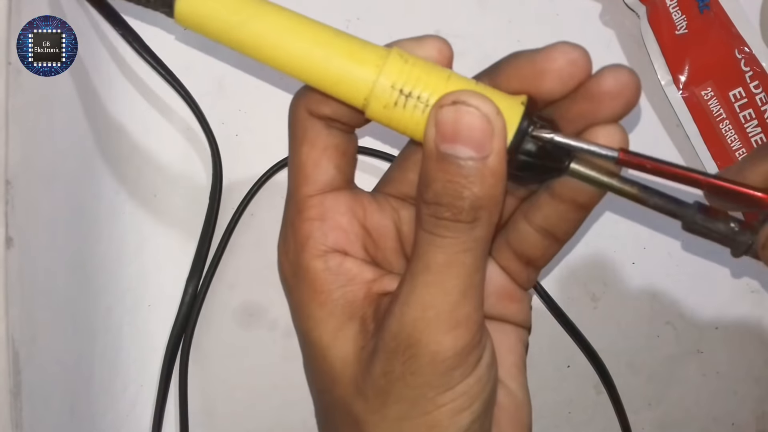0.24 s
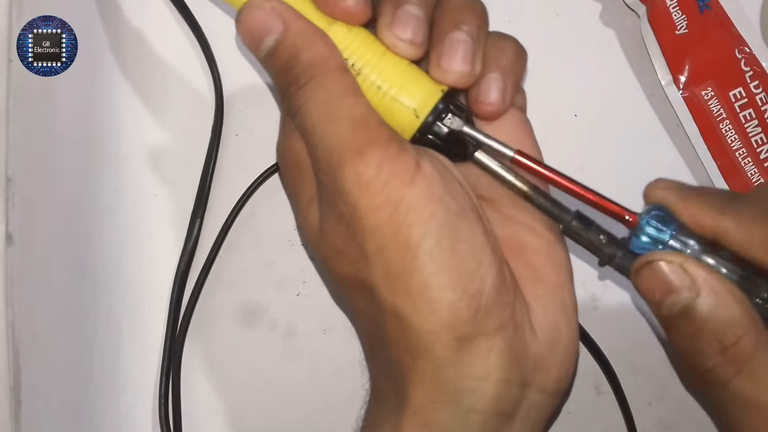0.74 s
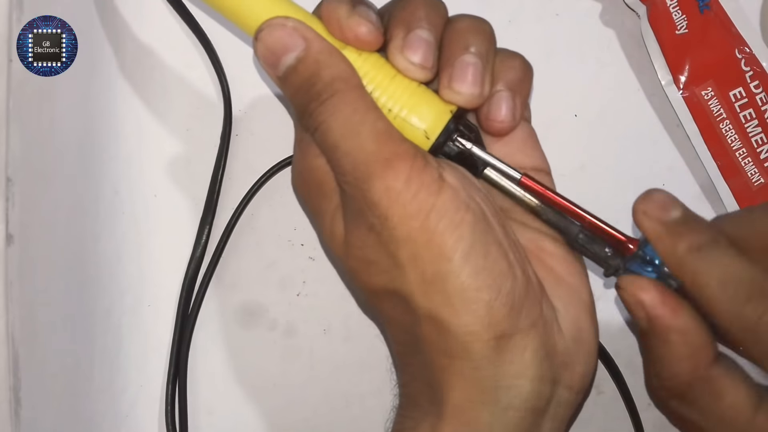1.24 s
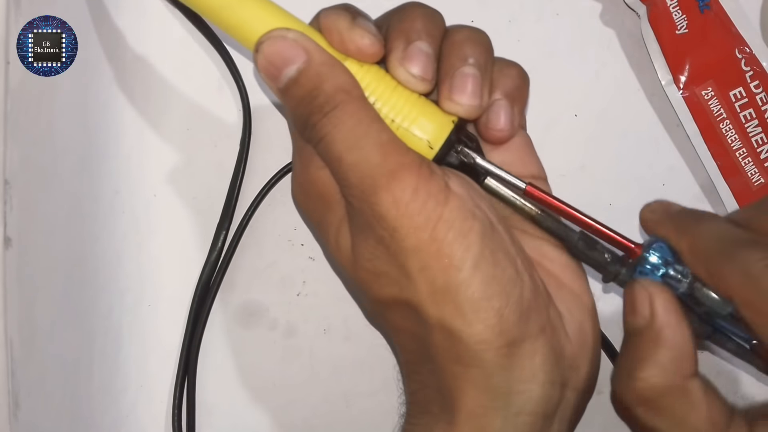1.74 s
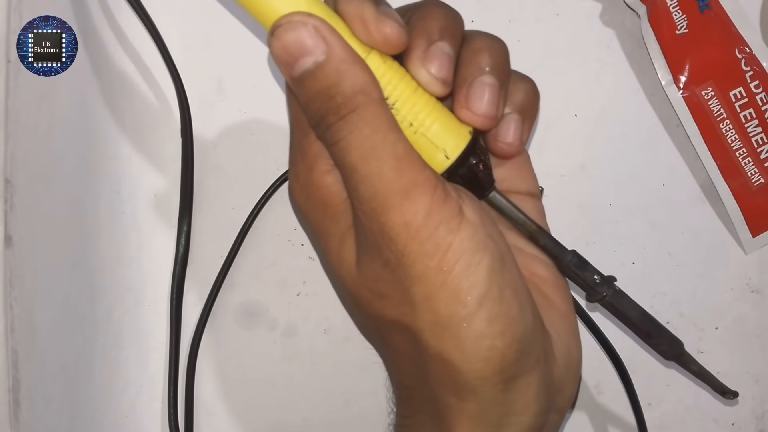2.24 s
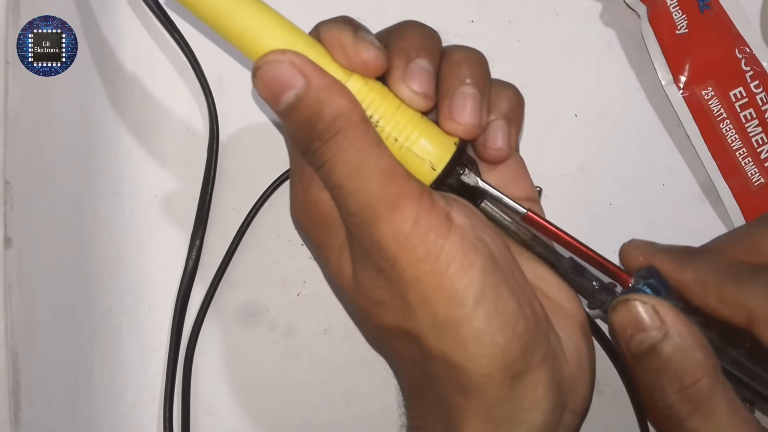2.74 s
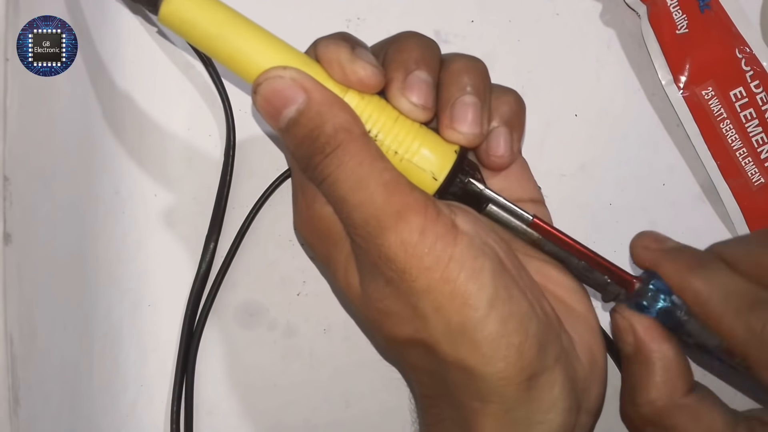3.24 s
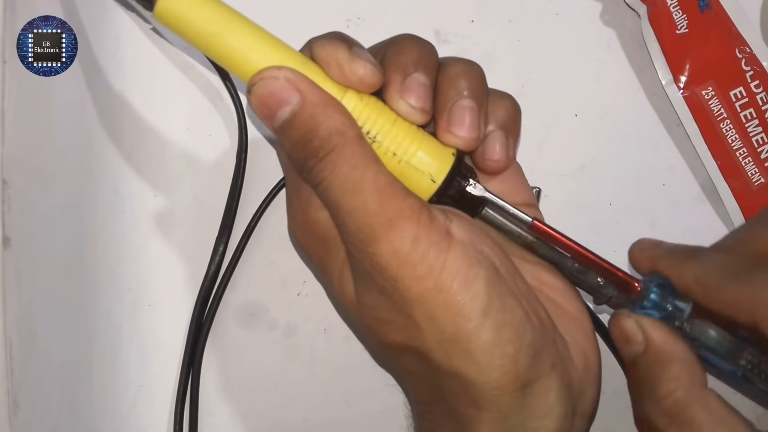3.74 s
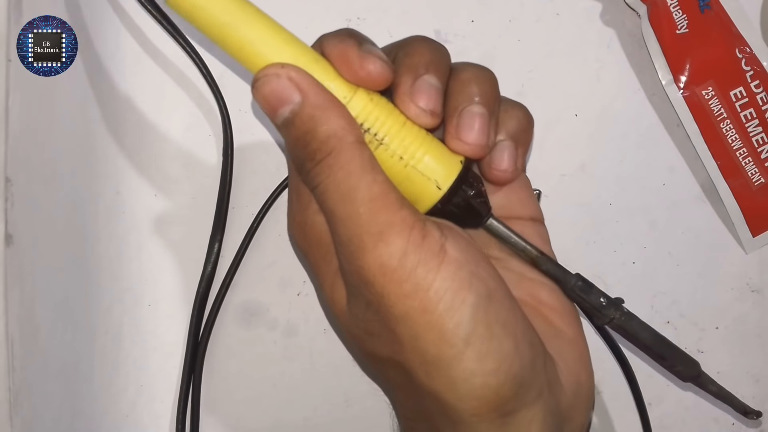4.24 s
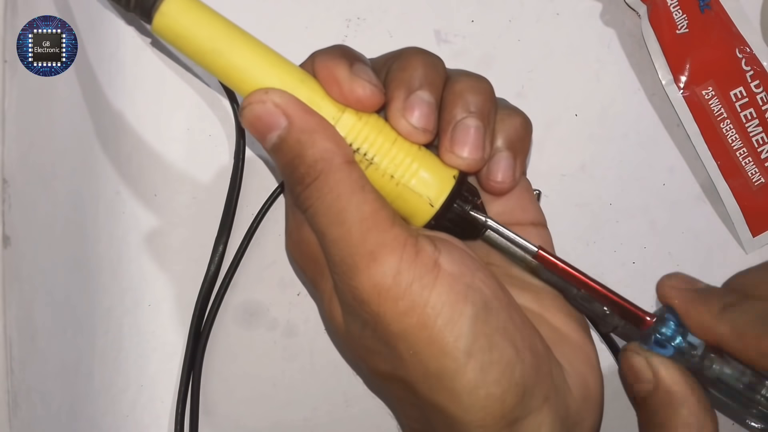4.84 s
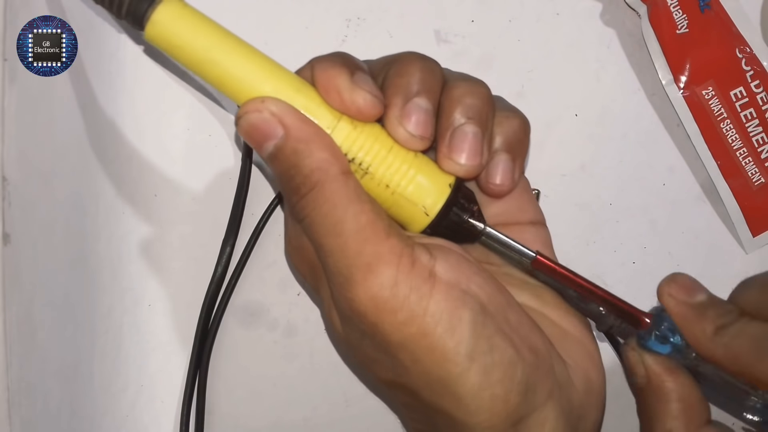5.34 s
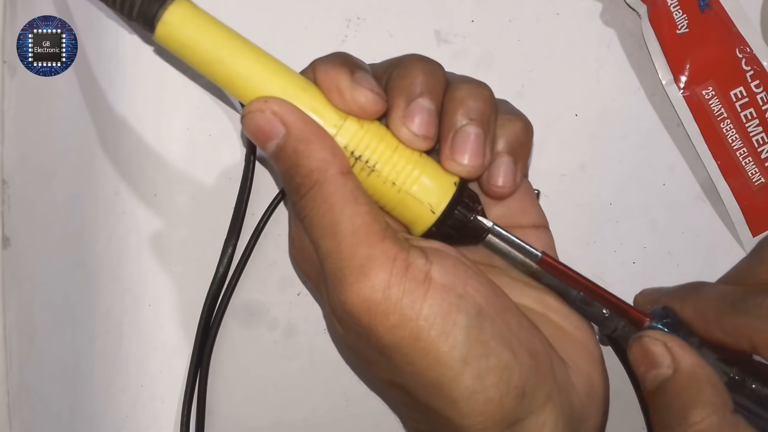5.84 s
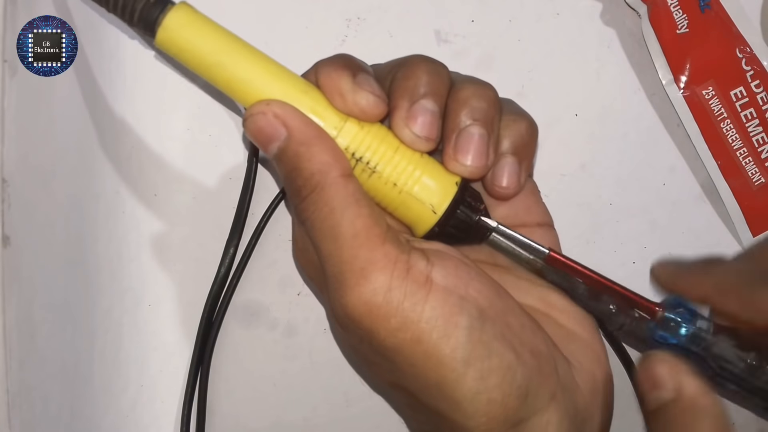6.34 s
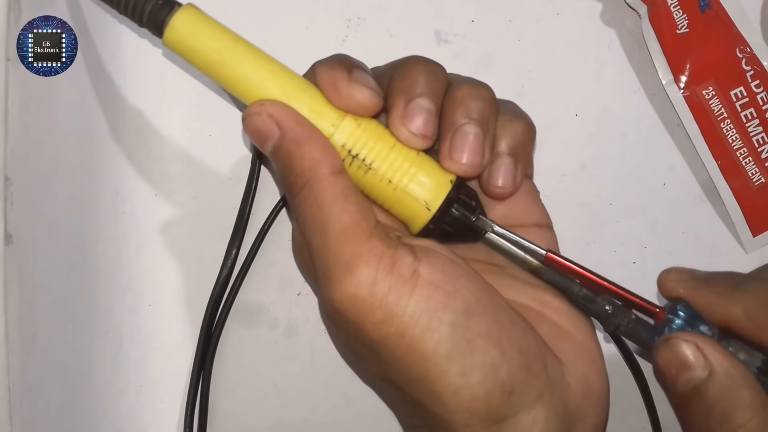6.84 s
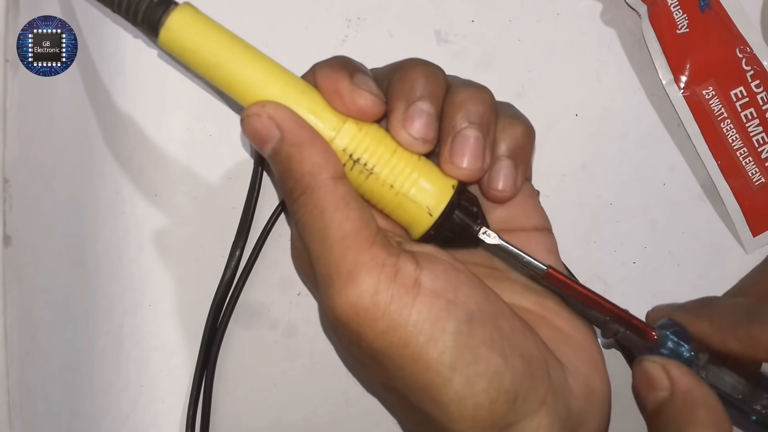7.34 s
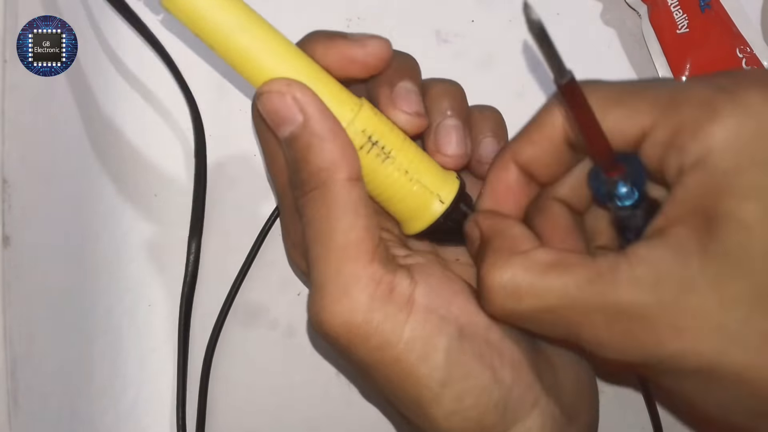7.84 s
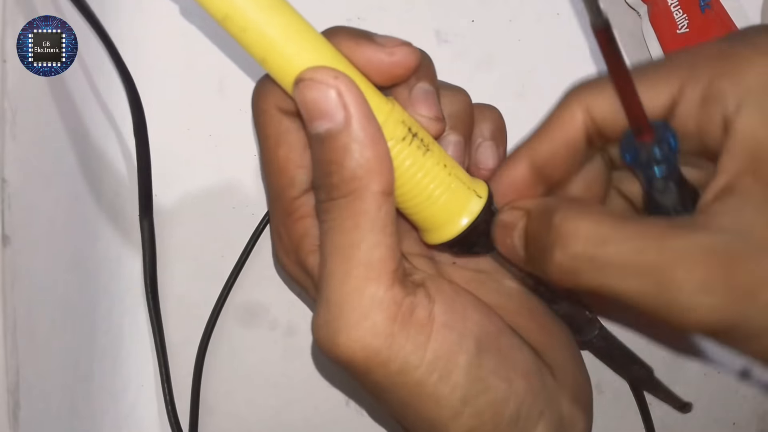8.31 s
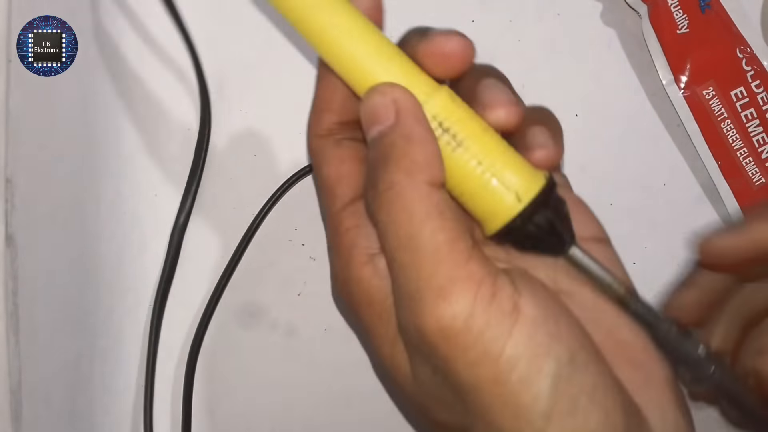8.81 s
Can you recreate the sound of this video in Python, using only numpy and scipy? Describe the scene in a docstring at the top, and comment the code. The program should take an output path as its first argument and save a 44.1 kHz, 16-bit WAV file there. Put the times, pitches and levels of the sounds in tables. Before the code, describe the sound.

Faint metal ticks and small plastic clicks lead into a tiny electric motor's high, hissing whine, with a dropped screw bouncing near the end.

```python
"""In a quiet room with a fan, a small screwdriver ticks on a soldering iron's screws, close to a phone.
Plastic snaps, then a small motor spins up and holds a shrill whine over rushing air and brush hiss.
Near the end a loose screw drops and bounces on the table. Contacts are coloured noise bursts,
the whine is sines locked to one shaft, the rushes are shaped noise, and a short echo gives width."""
import sys
import numpy as np
from scipy import signal
from scipy.fft import rfft, irfft, next_fast_len
from scipy.io import wavfile
from scipy.ndimage import map_coordinates

SR = 44100
rng = np.random.default_rng(int(sys.argv[2]) if len(sys.argv) > 2 else 0)


def wav_record(signal):
    """Record a signal, one row per channel, as 16-bit PCM in the file named by sys.argv[1]."""
    frames = np.transpose(np.atleast_2d(signal))
    bounded = np.clip(frames, -1, 1)
    # unit amplitude maps onto the largest positive 16-bit level
    quanta = np.round(bounded * 32767).astype(np.int16)
    wavfile.write(sys.argv[1], SR, quanta)


N = 399987

# Colour of the room's soft rush: f/Hz, relative density/dB
ROOM_COLOUR = [(20, 0.5), (50, -32), (140, -39.5), (229, -38.5), (427, -22.5), (677, -19), (818, -3),
               (1260, -11.5), (1560, -4), (1940, -9.5), (3340, -20), (5280, -18), (6210, -19.5),
               (6920, -24.5), (16000, -31.5)]
# Wavering fan lines: f/Hz, relative level/dB
FAN_LINES = [(799, -63.5), (912, -88), (943, -70), (1110, -69.5), (1446, -96), (1562, -79), (1599, -65),
             (1791, -77), (2398, -73)]
# Decay time of the room echo: f/Hz, t60/s
WALL_DECAY = [(200, .25), (2000, 0.094), (12000, 0.31)]
# Thin faint whistles: t/s, length/s, f/Hz, level/dB
WHISTLES = [(1.125, .09, 6560, -69), (1.22, .14, 3210, -71), (1.47, 0.16, 3167, -67.5),
            (1.802, .11, 6140, -64), (1.886, 0.64, 3640, -63.5)]
# The rotor's faint hum as it breaks free: t/s, length/s, f/Hz, level/dB
START_HUM = [(2.293, 0.12, 2460, -59.5)]

# Screwdriver tip on the screws: t/s, relative crack level/dB, body against crack/dB
TICKS = [(0.1448, -30, -29), (0.5316, -29, -30), (0.608, -31, -28), (0.6666, -39, -12),
         (0.7597, -32.5, -19), (0.8104, -35, -16), (0.846, -31.5, -36), (1.265, -22, -32),
         (1.5494, -24, -28), (1.7473, -39, -6)]
# Bright colour of metal contacts: f/Hz, relative gain/dB
METAL_COLOUR = [(800, -23), (2500, -4.5), (4500, -1.5), (7000, 3.5), (11000, 6), (15000, -2.5)]
# Plastic snaps, the last one the motor's switch: t/s, relative crack level/dB, body against crack/dB
SNAPS = [(2.0657, -38, -18), (2.0705, -44, -24), (2.0975, -40, -18), (2.161, -40, -2), (2.2207, -38, -14),
         (2.2875, -31.5, -8)]
# Colour of the plastic: f/Hz, relative gain/dB
PLASTIC_COLOUR = [(700, -22), (3800, -16), (5000, 8), (6000, -3.5), (7000, -5), (9000, -8), (12500, 0),
                  (15500, -1.5)]
# The screw bouncing on the table: t/s, relative crack level/dB, body against crack/dB
BOUNCES = [(8.7164, -20, -27), (8.7288, -23.5, -5.5), (8.7392, -23, -20), (8.7491, -28, -7),
           (8.757, -24.5, -8.5)]
# Colour of the table, lent to the body of every contact: f/Hz, relative gain/dB
TABLE_COLOUR = [(300, -25), (1100, 4), (2000, 4), (3000, 10.5), (4500, -17), (8000, -29)]
# Metal sliding briefly, the last one the dropped screw skidding: middle t/s, half length/s, relative level/dB
SCRAPES = [(.08, .03, -62), (.43, 0.045, -64.5), (0.617, 0.043, -57), (2.336, 0.023, -53.5),
           (4.13, 0.019, -55), (8.742, 0.027, -33.5)]

# Speed the motor settles to, drifting with its load: t/s, turns per second f/Hz
FULL_SPEED = [(3.1, 244.0), (3.23, 247.5), (3.45, 248.3), (3.66, 251.1), (4.4, 250.7), (4.73, 247.6),
              (4.96, 247.7), (5.08, 248.6), (5.61, 246.0), (5.86, 248.5), (5.97, 247.6), (6.63, 247.4),
              (6.81, 246.4), (7.61, 247.8), (8.1, 246.9), (8.83, 248.7), (9.03, 247.9)]
# Strong whine lines, three slot tones and a bearing tone: multiple of the shaft speed
STRONG_ORDERS = [21, 22, 23, 25.22]
# Their base levels, in the same order: level/dB
STRONG_DB = [-43.5, -35, -36.2, -34.5]
# Weaker shaft harmonics: multiple of the shaft speed, base level/dB
SHAFT_LINES = [(3, -66), (6, -54.5), (9, -56), (12, -63), (18, -57), (20, -56), (24, -89), (25, -47),
               (26, -70), (27, -63), (44, -54)]
# Weaker tones between the shaft harmonics, many of them one turn apart: multiple of the shaft speed
BETWEEN_ORDERS = [18.84, 19.75, 21.22, 22.22, 24.22, 26.22, 27.22, 28.22, 32.22, 46.22, 47.22, 48.22]
# Their base levels, in the same order: level/dB
BETWEEN_DB = [-61, -49, -71, -43.5, -91, -82, -68, -56, -64.5, -62, -60.5, -64]
# How well the motor housing radiates: f/Hz, relative gain/dB
HOUSING = [(300, -76.5), (700, -37), (1200, -15), (1450, 3.5), (1750, -1), (2050, 2), (2250, 0.5),
           (3000, 4), (3900, -21), (4400, 5), (5400, 10), (6400, 14), (7000, 3.5), (9000, -11),
           (13000, -2.5)]
# Narrow bands cancelled by standing waves: f/Hz, half width/Hz, depth/dB
NULLS = [(5275, 45, 9), (5458, 28, 8), (5645, 40, 9), (5757, 18, 6), (6160, 60, 6)]
# Colour of the air rush: f/Hz, relative density/dB
AIR_COLOUR = [(200, -31), (350, -31), (430, -19.5), (600, -27.5), (720, -15.5), (1000, -8.5), (1250, -2.5),
              (1900, -0.5), (2350, -0.5), (2700, -6.5), (3000, -9.5), (3300, -11.5), (3900, -5)]
# Colour of the brush hiss: f/Hz, relative density/dB
HISS_COLOUR = [(3900, -16), (4400, -3), (5000, 1.5), (5900, 0), (6500, 1.5), (7300, -6), (8000, -3),
               (9300, -4.5), (10500, -5), (11700, 0), (13200, -4.5), (15400, -6)]
# Course of the brush hiss, before its trim: t/s, relative level/dB
HISS_LEVEL = [(2.8, -41.5), (4.22, -40.5), (4.24, -41), (7.61, -42), (8.68, -41)]

# Random faint ticks: until when, base level and spread, body against crack
FIDGET_UNTIL_S, FIDGET_DB, FIDGET_SPREAD_DB, FIDGET_BODY_DB = 2.0, -46, 4, -15
# Dull bump of the hand on the grip
BUMP_S, BUMP_HZ, BUMP_DB, BUMP_T60_S = 4.12, 403, -53, 0.1
# Switch-on, and the time constant set by the rotor's inertia
START_S, SPIN_UP_S = 2.3, 0.128
AIR_DB, HISS_TRIM_DB = -45.5, 2.9  # air rush at full speed, lift of the whole hiss course
# Drop of each layer at rest; it shrinks with the square of the missing speed
AIR_REST_DROP_DB, HISS_REST_DROP_DB, WHINE_REST_DROP_DB = 159, 103, 122
# Weak lines stand out most at this share of missing speed
CROWD_DB, CROWD_AT = 5.5, 0.18
TOP_HZ = 15700


def amp(db):
    """Decibels to gain."""
    return 10 ** (np.asarray(db) / 20)


def unit(x):
    """Scale to rms 1."""
    return x / np.sqrt(np.mean(x ** 2) + 1e-20)


def along(points, hz):
    """Read a (Hz, value) curve on a log frequency axis."""
    f, value = np.transpose(points)
    return np.interp(np.log(hz + 1), np.log(f + 1), value)


def clock():
    """The time of every sample in seconds."""
    return np.arange(N) / SR


def curves(rows):
    """Draw each column after the time as a line, one value per sample."""
    s, *columns = np.transpose(rows)
    return [np.interp(clock(), s, column) for column in columns]


def wobble(rate):
    """A smooth random curve with rate knots a second."""
    coarse = clock()[::64]
    knots = rng.standard_normal(4000)
    return np.interp(clock(), coarse, map_coordinates(knots, [coarse * rate], mode="mirror"))


def filtered(x, response):
    """Multiply the spectrum of x by a response of frequency."""
    size = next_fast_len(N + 8192)
    spectrum = rfft(x, size) * response(np.fft.rfftfreq(size, 1 / SR))
    return irfft(spectrum, size)[..., :N]


def noise(colour, lo_hz=15, hi_hz=20000):
    """Noise of rms 1 with the given colour between two steep edges."""
    def response(hz):
        edges = 1 / np.sqrt((1 + (lo_hz / (hz + 1)) ** 20) * (1 + (hz / hi_hz) ** 20))
        return amp(along(colour, hz)) * edges
    return unit(filtered(rng.standard_normal(N), response))


def ring(x, colour, size=1024):
    """Pass x through a causal minimum-phase filter of unit energy with the given colour."""
    cepstrum = irfft(along(colour, np.fft.rfftfreq(size, 1 / SR)) * np.log(10) / 20)
    # fold the cepstrum forward so that the response starts at once
    cepstrum[1:size // 2] *= 2
    cepstrum[size // 2 + 1:] = 0
    response = irfft(np.exp(rfft(cepstrum)))
    return signal.oaconvolve(x, response / np.linalg.norm(response))[:N]


def tone(turns, db):
    """A sine of the given rms level, its phase counted in turns."""
    return np.sqrt(2) * amp(db) * np.sin(2 * np.pi * turns)


def room_tone(floor_db=-56, fan_db=-1):
    """A soft rush of shaped noise under fan lines that waver in pitch and level."""
    lines = np.zeros(N)
    for hz, db in FAN_LINES:
        lines += tone(hz * clock() + 0.14 * wobble(9), db + 2 * wobble(4.5))
    rush = amp(floor_db + 0.31 * wobble(6)) * noise(ROOM_COLOUR)
    return rush + amp(fan_db) * lines


def walls(x):
    """The room's short answer: noise decaying at its own rate per frequency, different on each side."""
    hz, t, grid = signal.stft(rng.standard_normal((2, SR // 3)), SR, nperseg=256)
    decay = amp(-60 * t / along(WALL_DECAY, hz)[:, None])
    tail = signal.istft(grid * decay, SR, nperseg=256)[1]
    return signal.oaconvolve(x[None], tail / np.linalg.norm(tail[0]), axes=1)[:, :N]


def whistles(overtone_db=-15, ramp_s=0.0083):
    """Faint whistles and the starting hum: slightly unsteady sines, each with a weak octave."""
    out = np.zeros(N)
    for s, length, hz, db in list(WHISTLES) + list(START_HUM):
        t = clock() - s
        gate = np.clip(np.minimum(t, length - t) / ramp_s, 0, 1)
        turns = hz * t + 0.077 * wobble(40)
        out += gate * (tone(turns, db) + tone(2 * turns, db + overtone_db))
    return out


def bump(attack_s=0.0071):
    """A hand bumps the grip: one soft, low, quickly damped sine."""
    t = np.maximum(clock() - BUMP_S, 0)
    attack = 1 - np.exp(-t / attack_s)
    return tone(BUMP_HZ * t, BUMP_DB - 60 * t / BUMP_T60_S) * attack


def scrapes(grain_db=6):
    """Sliding metal: short swells of uneven bright grains."""
    swell = np.zeros(N)
    for s, half, db in SCRAPES:
        swell += amp(db) * np.exp(-((clock() - s) / half) ** 2)
    grains = amp(grain_db * wobble(400)) * rng.standard_normal(N)
    return swell * unit(ring(grains, METAL_COLOUR))


def fidgets(count=20):
    """Faint ticks at random moments while the tip seeks the slot, as rows like TICKS."""
    rows = []
    for when, size in rng.random((count, 2)):
        db = FIDGET_DB + FIDGET_SPREAD_DB * (2 * size - 1)
        rows.append((FIDGET_UNTIL_S * when, db, FIDGET_BODY_DB))
    return rows


def contacts(rows, colour, crack_t60, tail_t60, tail_db, gain_db, knock_db):
    """Each contact is a sharp crack with a short rattle; part of it knocks the body behind it."""
    t = np.arange(SR // 10) / SR
    edge, body = np.zeros((2, N + len(t)))
    for s, db, body_db in rows:
        shape = amp(-60 * t / crack_t60) + amp(tail_db - 60 * t / tail_t60)
        bursts = shape * rng.standard_normal((2, len(t)))
        bursts /= np.linalg.norm(bursts, axis=1, keepdims=True)  # unit energy
        start = round(s * SR)
        edge[start:][:len(t)] += amp(db) * bursts[0]
        body[start:][:len(t)] += amp(db + body_db) * bursts[1]
    return amp(gain_db) * (ring(edge, colour) + amp(knock_db) * ring(body, TABLE_COLOUR))


def handling():
    """Metal and plastic contacts differ in colour and decay; scrapes and a bump join them."""
    ticks = contacts(list(TICKS) + fidgets(), METAL_COLOUR, crack_t60=0.00073, tail_t60=0.033,
                     tail_db=-18.5, gain_db=8.0, knock_db=12.5)
    snaps = contacts(SNAPS, PLASTIC_COLOUR, crack_t60=0.0072, tail_t60=0.069,
                     tail_db=-6, gain_db=20.5, knock_db=-15)
    screw = contacts(BOUNCES, METAL_COLOUR, crack_t60=0.0012, tail_t60=0.059,
                     tail_db=-20, gain_db=17.0, knock_db=0.5)
    return ticks + snaps + screw + scrapes() + bump()


def spun_up():
    """Share of full speed, 0 to 1, as the rotor overcomes its inertia."""
    return 1 - np.exp(-np.maximum(clock() - START_S, 0) / SPIN_UP_S)


def radiated(hz, usual_hz):
    """Gain in dB of a moving line: housing colour relative to its usual pitch, less the nulls it crosses."""
    coarse = hz[::64]
    gain_db = along(HOUSING, coarse) - along(HOUSING, usual_hz)
    for centre, width, depth_db in NULLS:
        gain_db = gain_db - depth_db * np.exp(-((coarse - centre) / width) ** 2)
    return np.interp(clock(), clock()[::64], gain_db)


def whine(full_hz, speed, turns, strain):
    """Strong and weak tones ride on one shaft and run unevenly while it accelerates."""
    def level(order, db):
        roughness_db = 12 * strain * wobble(70)
        return db + radiated(order * speed, order * full_hz.mean()) + roughness_db

    lines = np.zeros(N)
    for order, db in zip(STRONG_ORDERS, STRONG_DB):
        jitter = 0.046 * wobble(45) + 1.4 * strain * wobble(110)  # in turns
        lines += tone(order * turns + jitter, level(order, db) + 2.0 * wobble(3.6))
    weak = [(round(order), db) for order, db in SHAFT_LINES] + list(zip(BETWEEN_ORDERS, BETWEEN_DB))
    # the weak lines stand out shortly before full speed
    crowd_db = CROWD_DB * strain / CROWD_AT * np.exp(1 - strain / CROWD_AT)
    for order, db in weak:
        jitter = 0.0069 * order * wobble(22)
        lines += tone(order * turns + jitter, level(order, db) + crowd_db + 2.43 * wobble(5))
    return amp(-WHINE_REST_DROP_DB * strain ** 2) * lines


def air_rush(strain, churn_db=0.76):
    """Moving air: churning noise that swells with the rotor."""
    level_db = AIR_DB - AIR_REST_DROP_DB * strain ** 2 + churn_db * wobble(14)
    return amp(level_db) * noise(AIR_COLOUR, 218, 3760)


def brush_hiss(turns, strain, chop=0.14):
    """Treble noise from the brushes, which scrape harder once a turn."""
    rub = unit(1 + chop * np.sin(2 * np.pi * turns)) * amp(0.28 * wobble(30))
    course_db, = curves(HISS_LEVEL)
    level_db = course_db + HISS_TRIM_DB - HISS_REST_DROP_DB * strain ** 2
    return amp(level_db) * rub * noise(HISS_COLOUR, lo_hz=3770)


def motor():
    """One spinning shaft drives the whine, the air rush and the brush hiss."""
    running = spun_up()
    full_hz, = curves(FULL_SPEED)
    speed = full_hz * running
    turns = np.cumsum(speed) / SR
    strain = 1 - running  # share of speed still missing
    return whine(full_hz, speed, turns, strain) + air_rush(strain) + brush_hiss(turns, strain)


def scene():
    """Every source sits in the middle; only the echo of the handling has width."""
    close = handling()
    return room_tone() + whistles() + close + amp(-19.5) * walls(close) + motor()


def record(dry):
    """The phone keeps nothing above its band limit."""
    return filtered(dry, lambda hz: hz < TOP_HZ)


dry = scene()
out = record(dry)
wav_record(out)
```